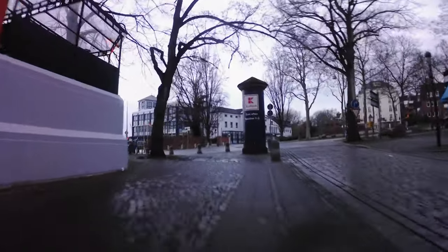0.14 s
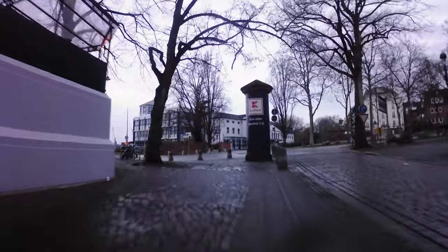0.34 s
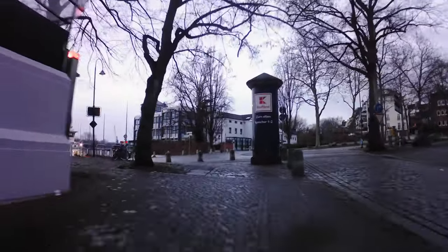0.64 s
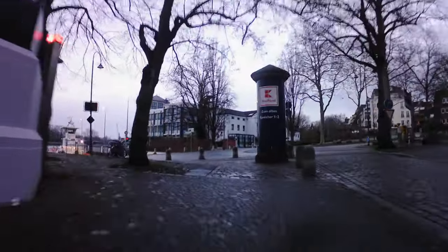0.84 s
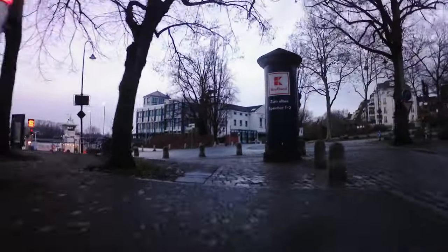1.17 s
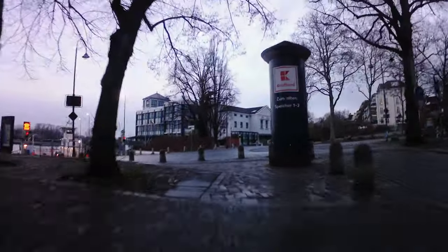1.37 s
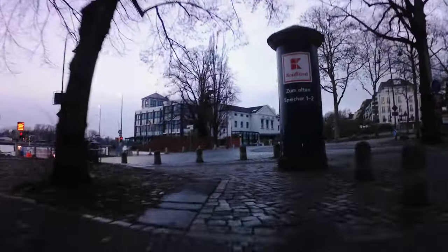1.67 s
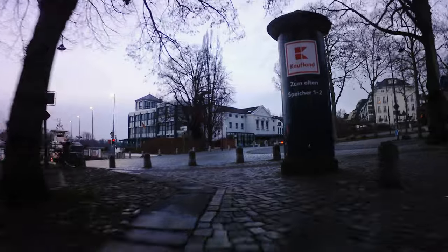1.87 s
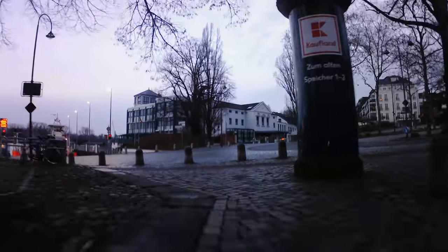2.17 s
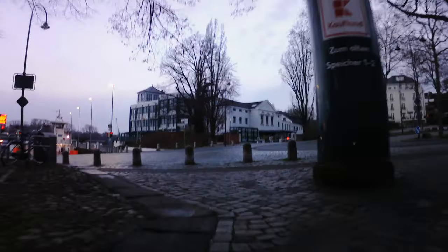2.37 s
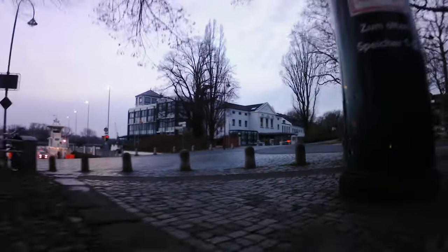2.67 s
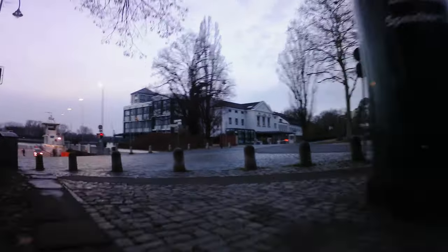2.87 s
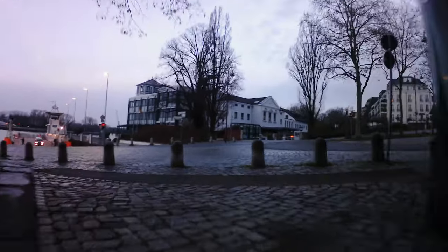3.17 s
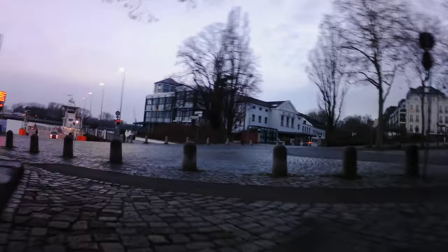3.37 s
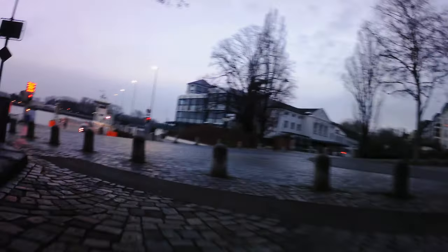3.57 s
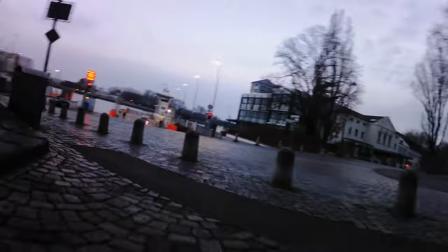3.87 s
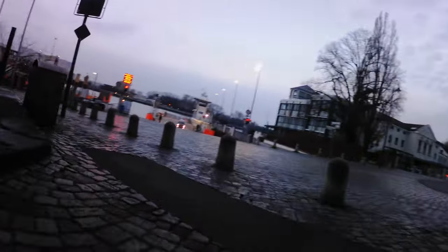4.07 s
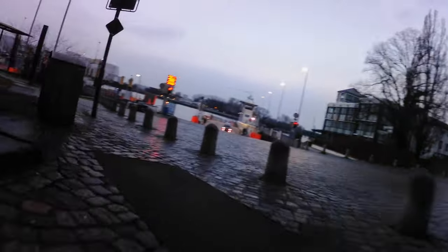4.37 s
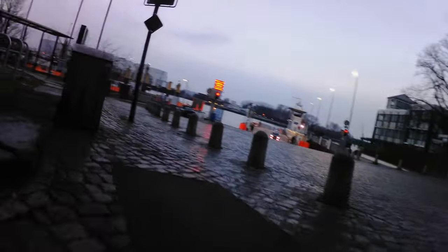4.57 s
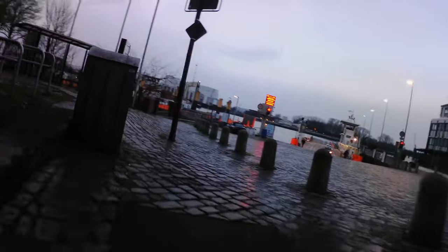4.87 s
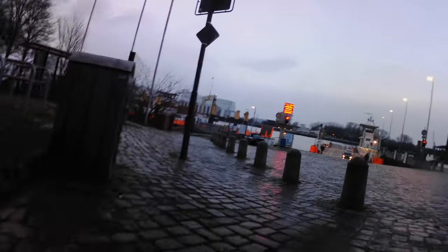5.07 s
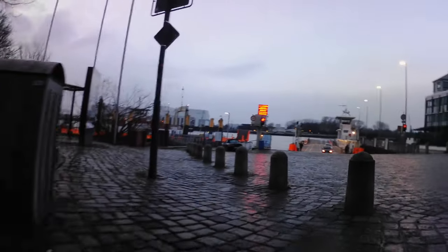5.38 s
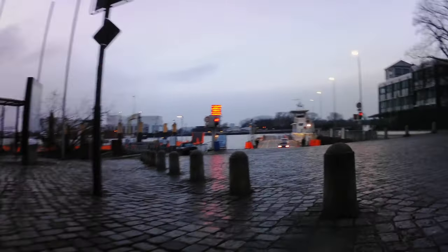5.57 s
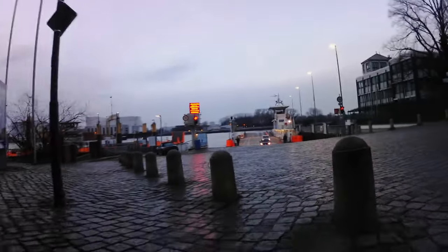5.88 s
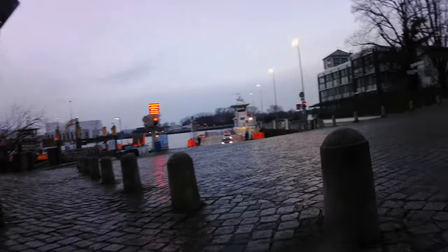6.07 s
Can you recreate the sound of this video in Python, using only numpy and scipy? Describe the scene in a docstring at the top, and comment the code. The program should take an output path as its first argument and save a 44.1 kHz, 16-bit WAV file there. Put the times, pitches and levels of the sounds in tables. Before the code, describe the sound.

Close, dry rumbling and clacking of a bike bouncing over stone paving, grit crunching and metal parts ticking, fading as it slows.

```python
"""Tyres drum on small paving and then cobbles; a cased camera clamped to the bicycle hears it through the frame.
Random bumps through the frame make the drumming; stone edges add short thuds, ringing and a boom of the housing.
Filtered cracks make crunching grit, uneven noise a faint treble hiss; struck modes make loose metal chatter.
The strongest booms overload the microphone into a dry, clicking rattle; the ride slows down and grows quiet."""
import sys
import numpy as np
from scipy import signal
from scipy.fft import rfft, irfft
from scipy.io import wavfile
from scipy.ndimage import uniform_filter1d

SR = 44100
rng = np.random.default_rng(int(sys.argv[2]) if len(sys.argv) > 2 else 0)


def store_pcm(level_fs):
    """Save levels as 16-bit WAV."""
    pcm = np.round(np.clip(level_fs, -1, 1) * 32767).astype(np.int16)
    wavfile.write(sys.argv[1], SR, np.atleast_2d(pcm).T)


N = 274302
TIME = np.arange(N) / SR
# time axis of one hit, in s; the contact is at 0
HIT = np.arange(-256, 6000) / SR


def undb(db):
    """Decibels to gain."""
    return 10 ** (np.asarray(db) / 20)


def unit_rms(x):
    """Scale to an rms of 1."""
    return x / np.sqrt(np.mean(x ** 2))


def envelope(x, size):
    """Amplitude, smoothed over size samples."""
    power = np.abs(signal.hilbert(x)) ** 2
    return np.sqrt(np.abs(uniform_filter1d(power, size)))


def unit_peak(x):
    """Scale to a short-term peak of 1."""
    return x / envelope(x, size=32).max()


def response(points, bumps=(), size=8192):
    """Causal (minimum-phase) impulse response of a smooth spectrum with resonances on top."""
    hz = np.maximum(np.fft.rfftfreq(size, 1 / SR), 1)
    point_hz, point_db = np.transpose(points)
    db = np.interp(np.log(hz), np.log(point_hz), point_db)
    for centre, width, gain in bumps:
        db = db + gain / (1 + (2 * (hz - centre) / width) ** 2)
    # folding the cepstrum puts all the energy after the impulse
    cepstrum = irfft(np.log(undb(db)))
    cepstrum[1:size // 2] *= 2
    cepstrum[size // 2 + 1:] = 0
    return irfft(np.exp(rfft(cepstrum)))


def through(x, body):
    """Send a force through a body."""
    return signal.fftconvolve(x, body)[:len(x)]


def add(out, s, hit):
    """Mix a hit in with its contact at time s."""
    start = int((s + HIT[0]) * SR)
    hit = hit[max(-start, 0):]
    part = out[max(start, 0):][:len(hit)]
    part += hit[:len(part)]


def random_bumps(per_s, spread_db):
    """Sparse impulses of either sign at random moments, with scattered sizes."""
    sizes = undb(spread_db * np.minimum(rng.exponential(size=N), 4)) * rng.choice([-1, 1], N)
    return sizes * (rng.random(N) < per_s / SR)


# Path along frame and housing to the microphone: (f/Hz, level/dB)
FRAME_PATH = [(30, -35.5), (60, -28.5), (110, -14.5), (290, -15.5), (390, -7.5), (550, 1), (700, -6.5),
              (820, -16), (1100, -16), (1500, -24), (1850, -36), (2300, -38.5), (4800, -76), (7000, -86),
              (12000, -104)]
# Resonances and dips of frame and housing on top of that: (f/Hz, width/Hz, level/dB)
HOUSING_RESONANCES = [(139, 14, 10), (195, 40, 3), (410, 34, 7), (495, 30, 2), (668, 24, 6), (823, 25, 5),
                      (944, 42, 7), (1265, 90, 10), (1610, 130, -8), (1820, 240, 6), (2420, 350, -6),
                      (2800, 90, -6), (3020, 200, 5), (3485, 130, 8), (3715, 110, 6), (4700, 160, 4),
                      (5120, 160, 4)]


def frame_response():
    """Frame and housing carry vibration to the microphone, favouring some pitches."""
    return response(FRAME_PATH, HOUSING_RESONANCES)


# Drumming along the ride, before the bounce: (t/s, level/dB)
DRUMMING = [(0.0, -27.5), (0.57, -29.5), (0.94, -26.5), (1.28, -25.5), (1.8, -26), (2.2, -28.5),
            (2.67, -31), (3.48, -33.5), (3.83, -34.5), (4.04, -33.5), (4.61, -31.5), (4.87, -34),
            (5.08, -36), (5.21, -42), (5.67, -38), (6.22, -44.5)]


def tyres(frame, give=1.97):
    """Small random bumps drum on the frame; the soft tyres round off the largest."""
    drum = unit_rms(through(random_bumps(per_s=900, spread_db=-0.5), frame))
    drum = unit_rms(drum / (1 + (envelope(drum, size=200) / give) ** 4) ** (1 / 4))
    return drum * undb(np.interp(TIME, *np.transpose(DRUMMING)))


def bounce(rate_hz=7.55, width_hz=5, depth_db=3.0):
    """The bicycle bounces on its tyres, so the drumming comes in lumps."""
    hz = np.fft.rfftfreq(N, 1 / SR)
    band = np.exp(-((hz - rate_hz) / width_hz) ** 2)
    load = irfft(rfft(rng.standard_normal(N)) * band, N)
    return unit_rms(undb(depth_db * np.tanh(unit_rms(load))))


# Single stone edges placed by time, from soft to hard, levels relative:
# (t/s, thud level/dB, thud f/Hz, ring level/dB)
PLACED_EDGES = [(0.0278, -18.5, 530, -33), (0.065, -13, 520, -33), (0.076, -17, 525, -42),
                (0.161, -19, 530, -29), (0.2035, -18.5, 530, -30), (0.2532, -17, 535, -29),
                (0.263, -16, 596, -26), (0.3475, -17.5, 540, -35), (0.39, -16.5, 530, -42),
                (0.5572, -16, 574, -41), (0.5783, -16.5, 600, -19.5), (0.5919, -16, 550, -34),
                (0.605, -18, 550, -32), (0.616, -18.5, 550, -16), (0.6584, -9.5, 542, -21),
                (0.7045, -16, 527, -29), (0.742, -13.5, 500, -19), (0.7639, -13, 574, -22.5),
                (0.8408, -11.5, 575, -22.5), (0.8594, -13, 670, -17), (0.8714, -11, 530, -32),
                (0.8937, -17, 640, -23), (0.9034, -16.5, 580, -45), (0.9503, -12, 568, -32),
                (0.9896, -8, 484, -19.5), (1.0009, -14, 554, -53), (1.0159, -18.5, 563, -18),
                (1.0305, -10.5, 528, -22), (1.0723, -10.5, 556, -26.5), (1.1275, -10, 598, -20),
                (1.1674, -9.5, 564, -14), (1.2009, -16, 580, -37), (1.2215, -15, 547, -46),
                (1.3041, -18.5, 560, -18.5), (1.3235, -13.5, 590, -20.5), (1.3586, -13, 557, -17.5),
                (1.3708, -16, 520, -14.5), (1.3822, -9.5, 549, -32), (1.4049, -17.5, 557, -24),
                (1.4168, -12, 540, -38), (1.4345, -6.5, 500, -15.5), (1.4497, -10.5, 560, -39),
                (1.5006, -12, 540, -19.5), (1.5735, -15.5, 520, -33), (1.6164, -17.5, 523, -18),
                (1.6326, -9, 523, -27.5), (1.6478, -17.5, 580, -38), (1.6825, -12.5, 520, -32),
                (1.6951, -21.5, 550, -20), (1.7528, -10, 538, -17), (1.7718, -10.5, 580, -17),
                (1.7887, -13, 560, -23), (1.8863, -18, 554, -20), (1.9071, -17.5, 550, -36),
                (1.9174, -11, 510, -22), (1.9701, -16.5, 536, -34), (2.0023, -9, 565, -46),
                (2.0547, -7, 554, -19), (2.0638, -11, 620, -17), (2.1011, -10, 546, -24),
                (2.192, -14, 550, -15), (2.203, -9, 548, -19), (2.2176, -13, 503, -49),
                (2.2816, -8, 510, -46), (2.2955, -5, 544, -50), (2.3166, -12.5, 700, -14),
                (2.3467, -16.5, 560, -19), (2.3841, -15.5, 550, -25.5), (2.4494, -15.5, 502, -23),
                (2.4609, -20.5, 580, -23.5), (2.5121, -15.5, 432, -24.5), (2.521, -25.5, 460, -18),
                (2.5677, -17, 560, -38), (2.735, -18, 515, -43), (2.7965, -17.5, 573, -40.5),
                (2.8533, -17, 587, -34), (2.9096, -15.5, 563, -28), (2.9815, -17, 610, -31),
                (3.0247, -17.5, 560, -30), (3.1557, -18.0, 520, -28.5), (3.2028, -14, 565, -32),
                (3.272, -16, 430, -22.5), (3.2847, -23.5, 450, -29), (3.3446, -15, 620, -21),
                (3.4814, -12.5, 537, -35), (3.5451, -13.5, 532, -27), (3.6047, -16, 470, -25),
                (3.7377, -17, 500, -20), (3.9628, -17.5, 536, -27.5), (4.0115, -13.5, 565.4, -36.5),
                (4.1332, -18, 500, -41), (4.2003, -16.5, 530, -20.5), (4.2143, -18, 440.6, -19.5),
                (4.2734, -10, 549, -24), (4.376, -15.5, 568, -39), (4.4164, -13.5, 540, -27),
                (4.4703, -9.5, 534, -27.5), (4.6526, -14.5, 466, -28), (4.6625, -17.5, 516, -28.5),
                (5.4549, -14, 538, -29.5), (5.524, -17, 524, -27), (5.6243, -22.5, 484, -40),
                (5.7035, -13, 503, -31.5), (5.79, -20.5, 629, -27.5), (6.0628, -26.5, 584, -46)]


def lift(depth=.6, width_s=.005, lead_s=.0012):
    """The tyre unloads for an instant as it meets a placed stone edge."""
    gaps = np.zeros(N)
    middle = HIT.mean()
    dip = np.exp(-((HIT - middle) / width_s) ** 2)
    for s, *_ in PLACED_EDGES:
        add(gaps, s - lead_s - middle, dip)
    return 1 - depth * np.minimum(gaps, 1)


def knocks(frame, edges, ring_s, thud_gain_db, ring_gain_db, boom_db, thud_s=0.002, boom_hz=420, boom_s=0.0051):
    """Each stone gives a thud of a few cycles and leaves the frame ringing and the housing booming."""
    out = np.zeros(N)
    after = (HIT > thud_s) * np.exp(-np.abs(HIT) / ring_s)
    swell = np.clip(HIT / (2 * thud_s), 0, 1) * np.exp(-np.abs(HIT) / boom_s)
    for s, thud_db, hz, ring_db in edges:
        phase = rng.uniform(0, 2 * np.pi)
        noise = rng.standard_normal(len(HIT))
        thud = np.exp(-(HIT / thud_s) ** 2) * np.cos(2 * np.pi * hz * HIT + phase)
        boom = undb(boom_db) * swell * np.cos(2 * np.pi * boom_hz * HIT + phase)
        ring = unit_peak(through(noise * after, frame)) + boom
        add(out, s, undb(thud_db + thud_gain_db) * thud + undb(ring_db + ring_gain_db) * ring)
    return out


# The ground, from slabs over small paving and cobbles to a smooth patch and slow cobbles, levels relative:
# (start t/s, edges per second/Hz, thud level/dB, jiggle level/dB)
SURFACES = [(0, 12.3, -21, -79), (0.559, 23.6, -22, -66), (.97, 29, -19, -54), (1.85, 25, -5, -58),
            (2.4, 17.6, -11.5, -62), (3.95, 15, -8.5, -67), (4.559, 10.9, -25.5, -76),
            (5.099, 13, -24.5, -84)]


def stone_edges(jitter=0.27, thud_hz=519, thud_scatter=0.14, ring_db=-14, count=80):
    """Ordinary edges at the uneven spacing of each surface, with columns as in PLACED_EDGES."""
    edges, placed = [], np.array(PLACED_EDGES)[:, 0]
    ends = [row[0] for row in SURFACES[1:]] + [N / SR]
    for (start, per_s, thud_db, _), end in zip(SURFACES, ends):
        early, detune = rng.standard_normal((2, count))
        # jitter is a share of the spacing, thud_scatter a share of the pitch
        times = start + (np.arange(count) + .5 + jitter * early) / per_s
        pitches = thud_hz * (1 + thud_scatter * detune)
        for s, hz in zip(times, pitches):
            # a placed edge takes the place of an ordinary one near to it
            if start < s < end and np.abs(placed - s).min() > .5 / per_s:
                edges.append((s, thud_db, hz, thud_db + ring_db))
    return edges


def cushion(x, give_db=-15.0):
    """The tyres soak up the largest ordinary bumps, so fewer of them clack."""
    return x / (1 + (envelope(x, size=100) / undb(give_db)) ** 6) ** (1 / 6)


# Drops into a joint that leave the housing booming: (t/s, level/dB, f/Hz)
JOINT_DROPS = [(2.301, -24.5, 417), (2.312, -28, 135), (2.636, -22, 634), (3.436, -23, 386),
               (3.890, -26, 416), (4.333, -22, 564), (4.651, -15, 480), (5.268, -33, 664),
               (5.703, -14, 430), (5.858, -27.5, 640)]


def booms(attack_s=0.0023, decay_s=0.011):
    """The housing rings on at one low pitch for a few hundredths of a second."""
    out = np.zeros(N)
    swell = np.clip(HIT / attack_s, 0, 1) * np.exp(-np.abs(HIT) / decay_s)
    for s, level_db, hz in JOINT_DROPS:
        add(out, s, undb(level_db) * swell * np.sin(2 * np.pi * hz * HIT))
    return out


def grit(bursts, body, gain_db, attack_s=0.0009):
    """Grit is crushed under the tyre in a dense shower of tiny cracks that dies away."""
    pressure = np.zeros(N)
    for s, level_db, decay_s in bursts:
        push = np.clip(HIT / attack_s, 0, 1) * np.exp(-np.abs(HIT) / decay_s)
        add(pressure, s, undb(level_db) * push)
    cracks = unit_rms(random_bumps(per_s=1500, spread_db=1.5))
    return undb(gain_db) * through(cracks * pressure, body / np.linalg.norm(body))


# Colour of grit crushed by a knock: (f/Hz, relative level/dB)
CRUNCH_COLOUR = [(700, -6), (1650, 7), (2200, -1.5), (2800, -6), (3600, -18), (5200, -17), (7500, -23),
                 (12000, -31.5)]


def crunches(decay_s=.013):
    """Every placed edge crushes grit in a short crunch, in proportion to its thud."""
    bursts = [(s, thud_db, decay_s) for s, thud_db, *_ in PLACED_EDGES]
    return grit(bursts, response(CRUNCH_COLOUR), gain_db=-34)


# The tyre scrunches over loose grit, levels relative: (t/s, level/dB, decay t/s)
SCRUNCHES = [(0.578, -35, 0.01), (1.168, -46, 0.033), (1.37, -57, 0.021), (1.755, -61, 0.026),
             (2.055, -48, 0.051), (2.285, -49, 0.042), (2.316, -52.5, 0.04), (2.51, -48, 0.039),
             (2.568, -51, 0.019), (3.735, -49.5, 0.021), (3.962, -50.5, 0.032), (4.008, -48, 0.027),
             (4.274, -56, .02), (4.415, -46.5, 0.018), (4.472, -50.5, 0.023), (4.655, -54.5, 0.042)]
# Colour of the loose grit: (f/Hz, relative level/dB)
GRIT_COLOUR = [(700, -19), (1500, -3.5), (2300, 15), (3600, -8.5), (5200, -11), (7500, -18), (12000, -25)]


def scrunches():
    """Loose grit cracks under the tyre and is heard through the housing."""
    return grit(SCRUNCHES, response(GRIT_COLOUR, HOUSING_RESONANCES), gain_db=-1.5)


# The loose metal part striking: (t/s, level/dB, tilt/dB per octave)
CHATTERS = [(1.259, -48, 16), (1.293, -39.5, 16), (1.461, -40, 7), (2.926, -23, 3), (2.957, -51, 5),
            (3.1766, -47, 7), (3.343, -18.5, 3), (3.379, -40, -6.5), (3.490, -42.5, 15), (3.523, -47, 12),
            (3.613, -45.5, 13), (3.742, -39.5, 16), (3.794, -52, 10), (3.812, -49, 16), (4.036, -41.5, 13),
            (4.321, -48.5, 14), (4.506, -52, 2), (4.518, -41.5, 16), (4.5335, -39.5, 1.5),
            (4.686, -51.5, 7.5)]
# Modes of the loose metal part: (f/Hz, relative level/dB, t60/s)
METAL = [(1875, 0, .035), (2015, -4, .025), (2690, -10, .016), (2998, -6, .025), (3485, -5, .045),
         (3715, -6, .045), (4200, -11, .02), (4622, -9, .025), (5080, -7, .022), (5650, -8, .02),
         (6150, -7, .016)]
# A second, lighter part that rattles: (t/s, level/dB, tilt/dB per octave)
RATTLES = [(1.236, -41, 6), (1.275, -40, 2), (1.349, -42, 6), (5.070, -54.5, 8), (5.228, -58, 0),
           (5.603, -45.5, -2), (5.674, -61, 8), (5.744, -42, 4), (5.773, -43, -3)]
# Modes of the lighter part: (f/Hz, relative level/dB, t60/s)
LIGHT_METAL = [(2550, 0, .02), (3050, -9, .01), (3600, -4, .009), (4200, -13, .06), (5150, -3, .013)]
# Path from the strikes of loose parts to the microphone: (f/Hz, relative level/dB)
CONTACT_PATH = [(600, -17), (1700, 9.5), (3700, 0), (5500, -14.5), (7500, -29.5), (12000, -43)]


def chatters(strikes, part, bounce_s=0.0013, scrape_s=0.018, scrape_db=-17, count=5):
    """A loose part strikes, bounces unevenly a few times, each time softer, and scrapes to rest."""
    out = np.zeros(N)
    hz, db, t60 = np.array(part).T[:, :, None]
    contact = response(CONTACT_PATH)
    for s, level_db, tilt_db in strikes:
        ring = np.zeros(len(HIT))
        level = undb(db + tilt_db * np.log2(hz / hz[0]))
        lags = np.append(0, np.cumsum(bounce_s * rng.uniform(.5, 1.5, count - 1)))
        for k, lag in enumerate(lags):
            # each bounce lands on another spot, which shifts and reweights the modes
            shift = 1 + .009 * rng.standard_normal(hz.shape)
            weight = 1 + .3 * rng.standard_normal(hz.shape)
            age = np.maximum(HIT - lag, 0)
            modes = level * weight * np.sin(2 * np.pi * hz * shift * age)
            fade = np.exp(-np.log(1000) * age / t60)
            ring += .85 ** k * (modes * fade).sum(0)
        scrape = rng.standard_normal(len(HIT)) * (HIT > 0) * np.exp(-np.abs(HIT) / scrape_s)
        strike = through(unit_peak(ring) + undb(scrape_db) * scrape, contact)
        add(out, s, undb(level_db) * unit_peak(strike))
    return out


def jiggles(per_s=60, spread_db=4, ring_share=0.96, centre_hz=3400, fall_db_per_octave=4, count=600):
    """Loose parts jiggle at random, at the level of each surface, each touch with its own pitch and modes."""
    out, age = np.zeros(N), np.maximum(HIT[:2000], 0)
    hz, db, t60 = np.array(METAL).T[:, :, None]
    db = db - fall_db_per_octave * np.abs(np.log2(hz / centre_hz))
    fades = undb(db) * np.exp(-np.log(1000) * age / (ring_share * t60))
    starts, *_, levels = np.transpose(SURFACES)
    times = np.cumsum(rng.exponential(size=count)) / per_s
    for s in times[times < N / SR]:
        size, pitch, *spot = rng.standard_normal(len(hz) + 2)
        surface = max(np.searchsorted(starts, s) - 1, 0)
        modes = fades * np.sin(2 * np.pi * hz * (1 + .07 * pitch) * age)
        add(out, s, undb(levels[surface] + spread_db * min(size, 2)) * (spot @ modes))
    return out


# Uneven treble hiss along the ride: (t/s, level/dB)
TREBLE_LEVEL = [(0, -71), (.54, -83), (.6, -58), (1.3, -56.5), (2.1, -64.5), (2.7, -81), (4.5, -79),
                (4.8, -85.5), (6.22, -95)]
# Colour of the treble hiss: (f/Hz, relative level/dB)
TREBLE_COLOUR = [(600, -32), (1700, 9), (3500, -7), (4400, -7.5), (8000, -10.5), (12000, -17)]


def treble_hiss(flutter_db=4):
    """A faint uneven treble hiss between the knocks, mostly on the small paving."""
    flutter = undb(flutter_db * rng.standard_normal(N // 300 + 1))
    # each level lasts 300 samples; the smoothing softens the steps
    flutter = uniform_filter1d(np.repeat(flutter, 300), size=130)[:N]
    hiss = unit_rms(through(flutter * rng.standard_normal(N), response(TREBLE_COLOUR)))
    return hiss * undb(np.interp(TIME, *np.transpose(TREBLE_LEVEL)))


# Colour of the steady hiss, before the housing: (f/Hz, relative level/dB)
AIR_COLOUR = [(1000, -4.5), (1900, 12.5), (2300, 4), (3500, 4), (4300, -9), (4900, -2.5), (5600, -14.5),
              (7000, -25.5), (12000, -14.5)]


def air(level_db=-79):
    """A faint steady hiss under everything, coloured by the housing."""
    hiss = through(rng.standard_normal(N), response(AIR_COLOUR, HOUSING_RESONANCES))
    return undb(level_db) * unit_rms(hiss)


def scene():
    """Frame and mount bring it all to the microphone at no distance, so it is dry."""
    frame = frame_response()
    ordinary = knocks(frame, stone_edges(), ring_s=0.012, thud_gain_db=-12.0, ring_gain_db=4.5, boom_db=-5.0)
    placed = knocks(frame, PLACED_EDGES, ring_s=0.011, thud_gain_db=1.0, ring_gain_db=1.0, boom_db=-1.0)
    rolling = tyres(frame) * bounce() + ordinary
    shake = cushion(rolling) * lift() + placed
    ground = crunches() + scrunches() + treble_hiss()
    loose = chatters(CHATTERS, METAL) + chatters(RATTLES, LIGHT_METAL) + jiggles()
    return (shake + booms() + ground + loose + air())[None]


def overload(x, limit_db=-17.5, sag=0.49):
    """The microphone cannot follow the crests: they flatten and cave in, which turns a thud into a clack."""
    excess = np.maximum(np.abs(x) / undb(limit_db), 1)
    return x / excess * (1 - sag * (1 - 1 / excess))


def gain_control(x, rest_db=-35, slope=0.33, follow_s=0.28):
    """The gain creeps up when the ride gets quiet."""
    step, rest = 1 / (follow_s * SR), undb(rest_db)
    level = rest + signal.lfilter([step], [1, step - 1], np.abs(x) - rest)
    return x * np.maximum(rest / level, 1) ** slope


# The camera holds back the boom of the housing and lifts the treble: (f/Hz, level/dB)
CAMERA_TONE = [(30, -25), (70, -11), (150, -7), (300, -4.5), (400, 0.5), (570, -4), (700, 1.5), (850, -2.5),
               (1100, -5), (1700, 2), (3000, 2), (6000, 3), (12000, 2.5)]


def record(dry, top_hz=12300):
    """Overload, tone, gain control and the cut at the top; the treble lift makes flattened crests spiky."""
    toned = through(overload(dry[0]), response(CAMERA_TONE))
    top_cut = signal.ellip(8, .2, 70, top_hz, fs=SR, output="sos")
    return signal.sosfilt(top_cut, gain_control(toned))[None]


dry = scene()
out = record(dry)
store_pcm(out)
```